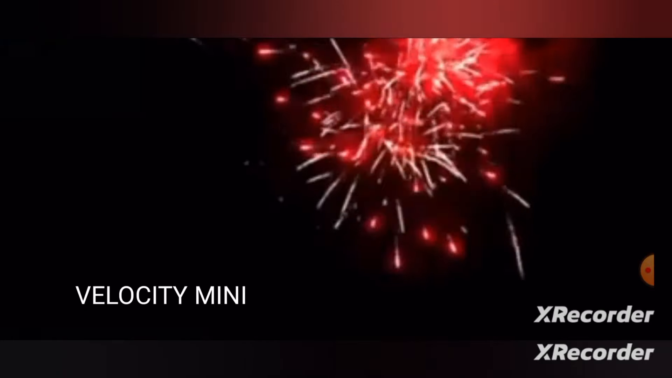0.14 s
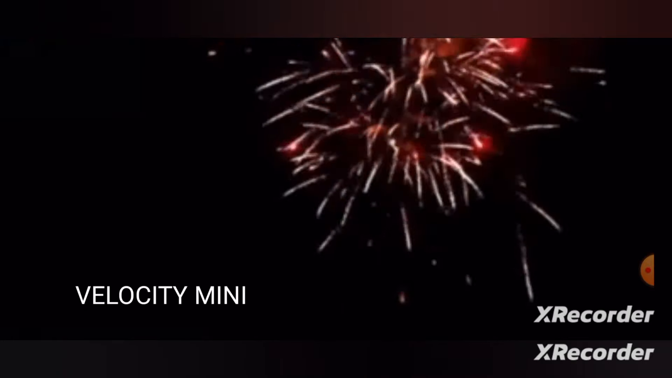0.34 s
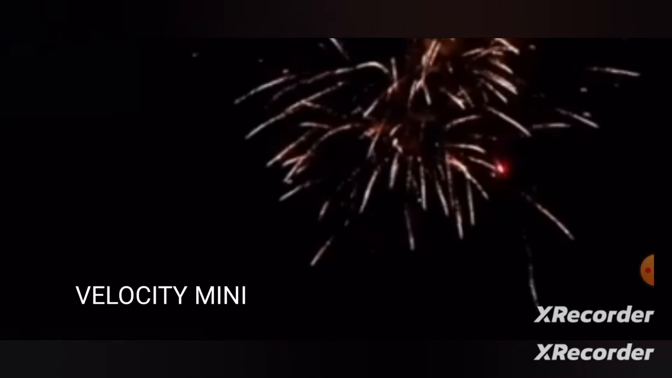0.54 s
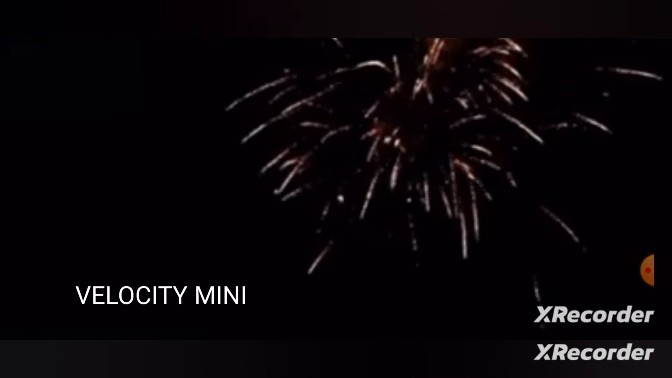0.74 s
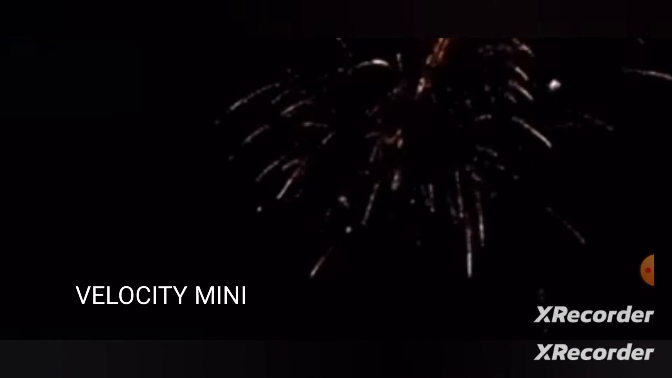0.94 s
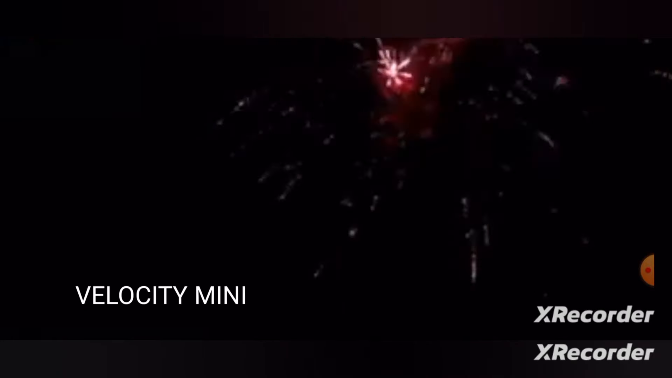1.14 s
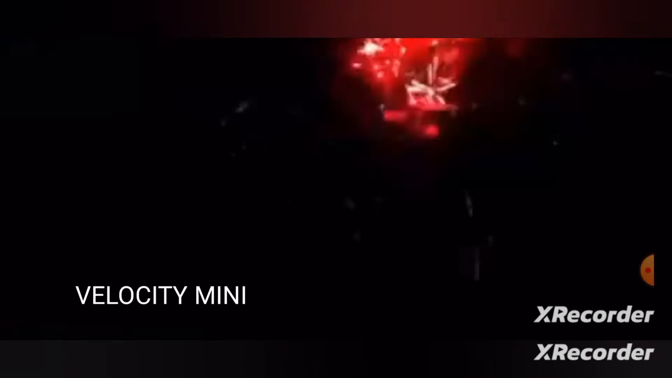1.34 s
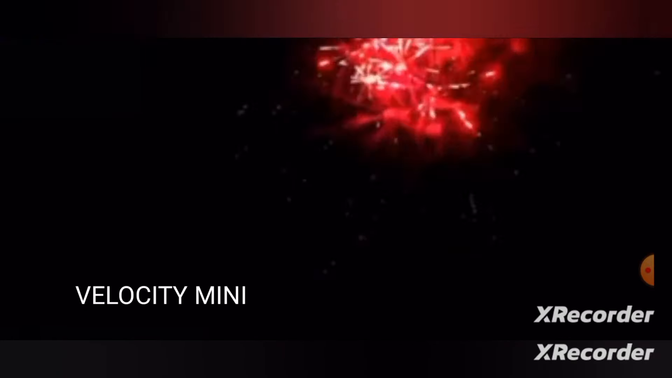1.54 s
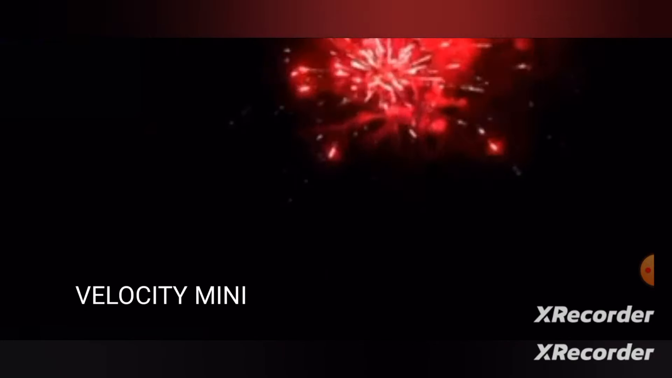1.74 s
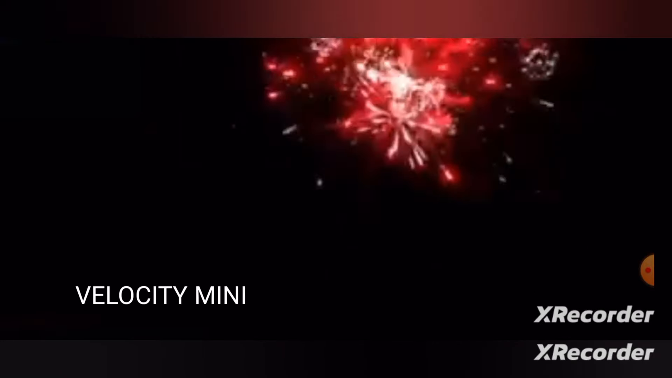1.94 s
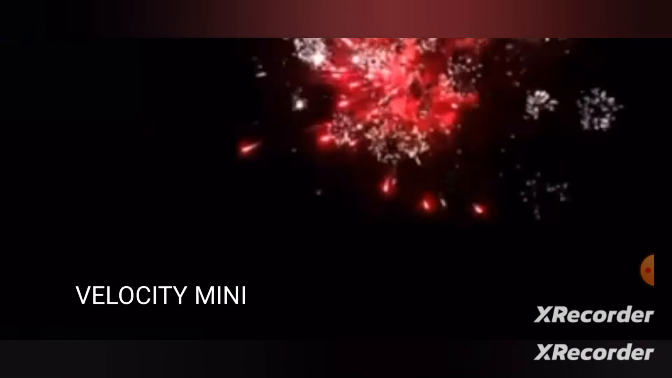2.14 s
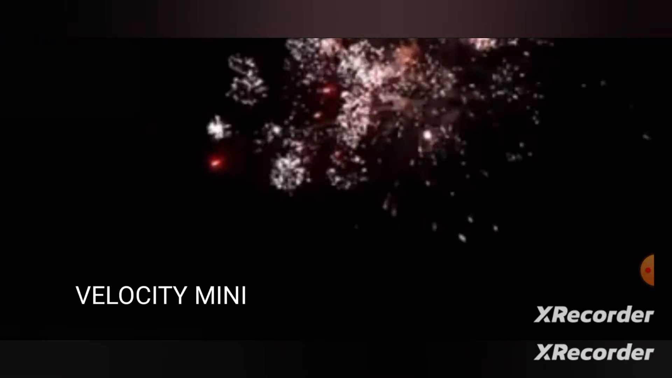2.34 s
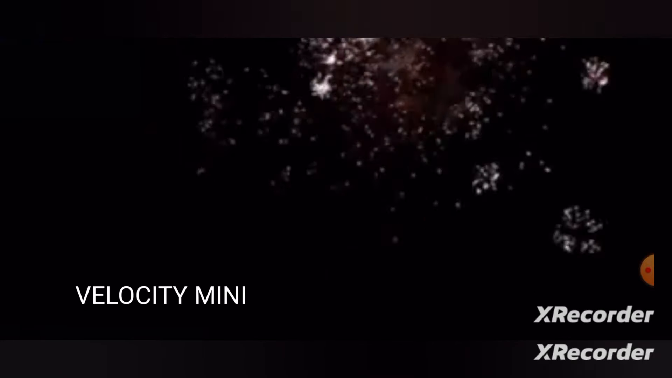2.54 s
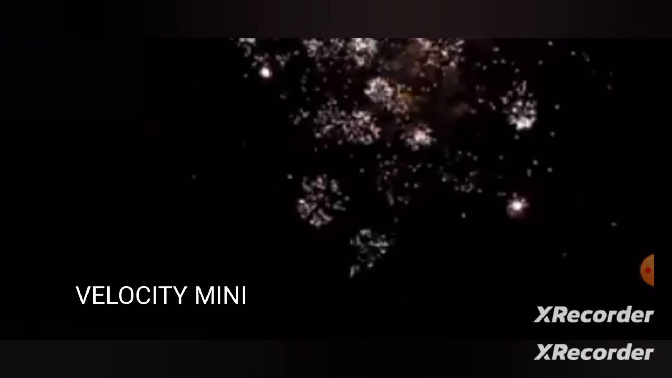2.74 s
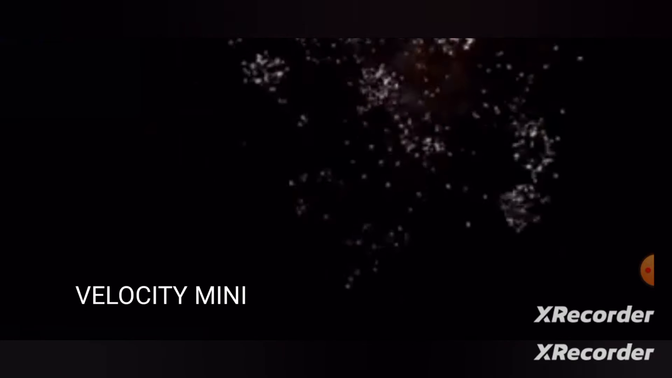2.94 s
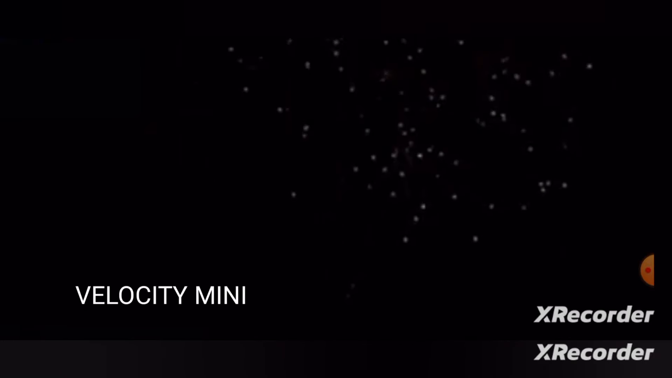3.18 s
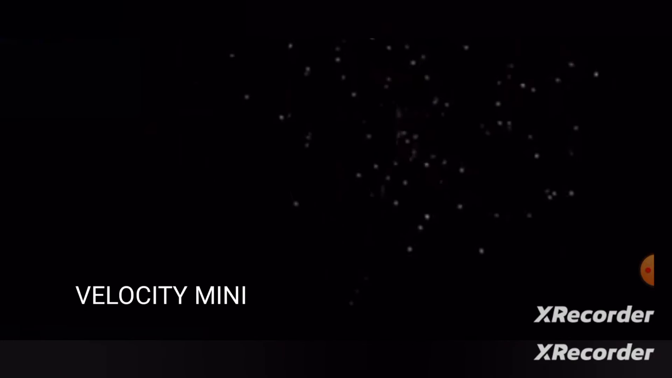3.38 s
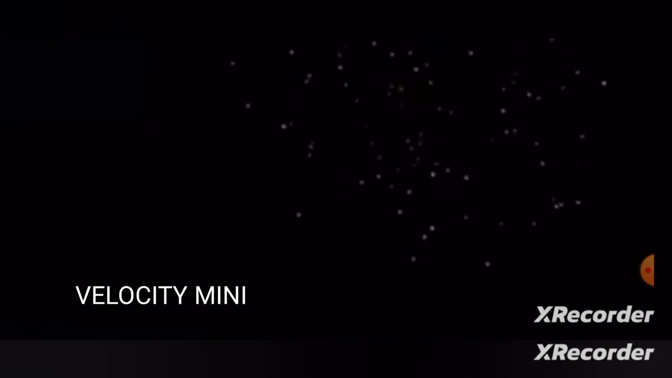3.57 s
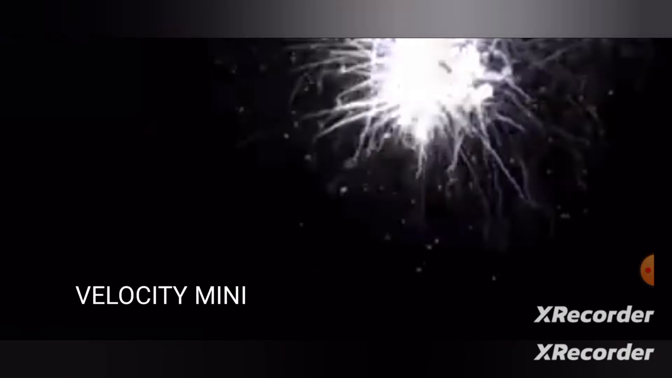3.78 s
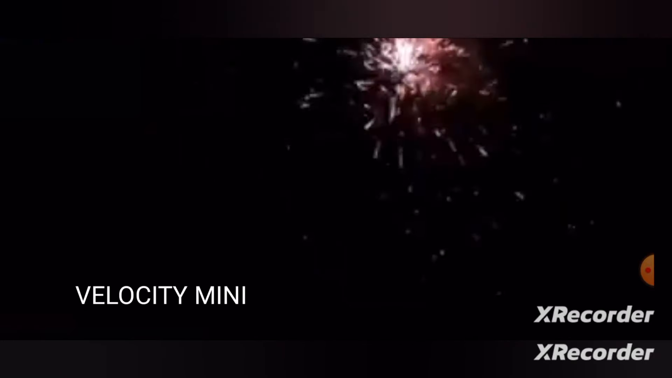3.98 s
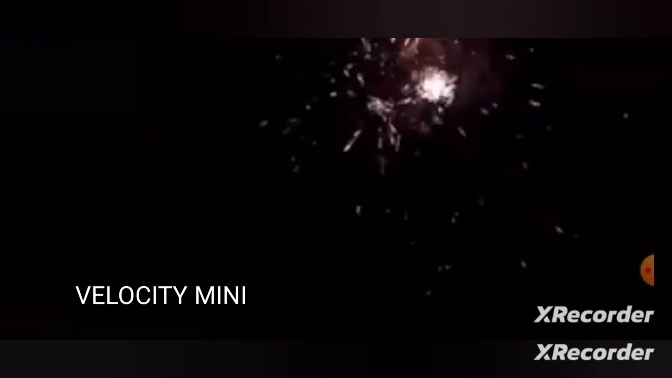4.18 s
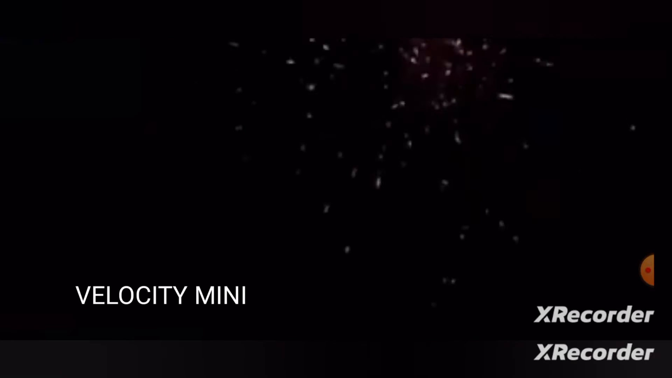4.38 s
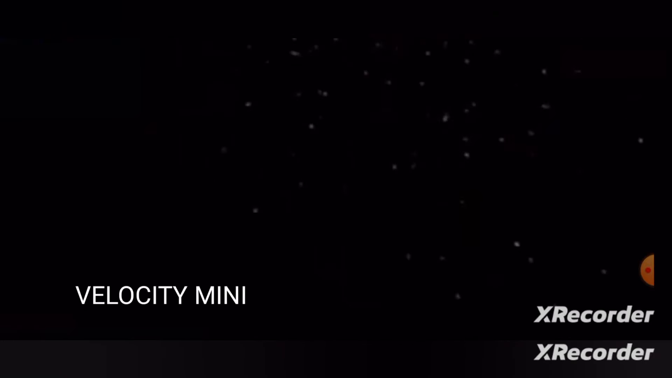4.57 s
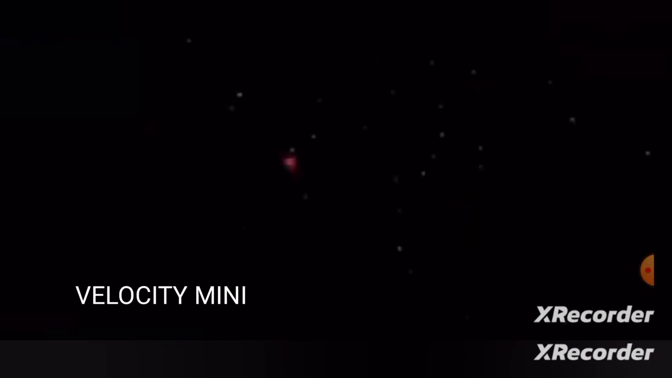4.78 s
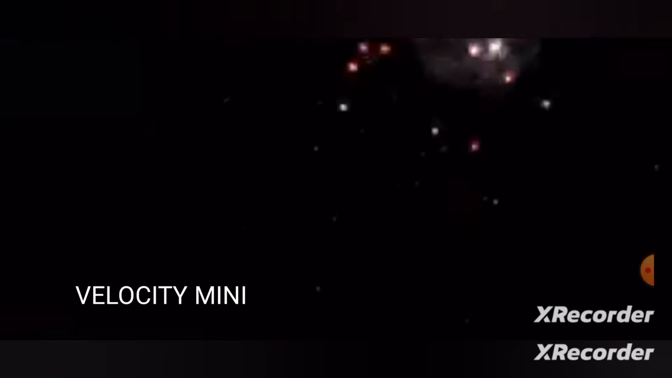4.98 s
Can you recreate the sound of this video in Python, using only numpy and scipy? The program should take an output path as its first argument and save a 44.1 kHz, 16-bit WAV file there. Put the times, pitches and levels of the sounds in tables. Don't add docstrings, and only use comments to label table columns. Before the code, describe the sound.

Heavy firework lift shots punch the overloaded microphone, each with quick ground echoes and a thud off a far wall. Sparks fizz and sizzle over low rumble. Three volleys: a brief opening one, a long one ending in thick popping crackle, and a short final burst with stray snaps. Between them only a faint far-off low hum remains. A tinny, delayed loudspeaker copy colours everything with a harsh ring.

```python
import sys
import numpy as np
from scipy import signal
from scipy.fft import rfft, irfft, next_fast_len
from scipy.io import wavfile
from scipy.ndimage import uniform_filter1d

SR = 44100
rng = np.random.default_rng(int(sys.argv[2]) if len(sys.argv) > 2 else 0)


def to_wav(sig):
    pcm = np.clip(np.atleast_2d(sig), -1, 1) * 32767
    pcm = np.round(pcm).astype(np.int16)
    wavfile.write(sys.argv[1], SR, pcm.T)


def rack_gain(trim_db):
    fader = np.asarray(trim_db, float)
    return 10 ** (fader / 20)


N = 221116
LAG = 3843
LENGTH = N + LAG


# (time [s], strength [dB], length [ms],
# ground echo delay [ms], slow air swing [signed size])
LIFT_BLASTS = [(0.0241, 10, 0.65, 4.54, 2.3), (0.1376, 12, 0.48, 6.3, 1.5), (.146, 2, 0.41, 5, 0),
               (0.079, -3, 0.7, 3.9, 0.9), (1.3371, 10, 0.82, 4.9, 1.3), (1.399, 5, 0.31, 6.1, 0),
               (1.544, 12, 0.71, 4.05, -2.5), (1.5942, 8.5, 0.5, 6.2, 2.4), (1.6778, 11, 0.6, 5.85, 3.1),
               (1.7397, 12, 0.52, 6, 3.9), (1.8598, 10.5, 0.84, 4.35, 1.7), (2.0214, 13, 0.52, 5.6, 2.5),
               (2.1137, 11, 0.51, 5.3, 1.7), (3.8764, 10.5, 0.54, 5, -0.7), (3.9014, 10, 0.53, 5, 1.1),
               (3.9478, 9.5, 0.5, 5.76, 1.2), (3.9703, 9, 0.88, 4.24, 0.9), (4.0735, 12, 0.53, 6.3, 1),
               (4.083, 7, 0.7, 6.7, 3.5), (4.1913, 12.5, 0.87, 4.64, 2.3), (4.33, 6.5, 0.79, 5.1, 1.8)]
# (share of the blast [ratio], dull above [Hz])
GROUND_BOUNCES = [
    (0.68, 1100),
    (0.18, 880),
    (0.11, 230),
]
# (frequency [Hz], level [dB])
WALL_TONE = [(150, -25.5), (480, 4.5), (900, -9.5), (2500, -24.5)]


def blasts():
    out = np.zeros(LENGTH)
    t = np.arange(4000) / SR
    near_tone = [(80, -27.5), (220, 1.5), (450, -13.0), (1200, -17.0), (4000, -31.5)]
    wall_s, wall_smear_s = 0.0617, 0.0054
    scatters = rng.standard_normal((len(LIFT_BLASTS), 4000))
    for (s, db, ms, echo_ms, swing), scatter in zip(LIFT_BLASTS, scatters):
        u = np.maximum((t - .0006) * 1000 / ms, 0)
        push = -np.cos(np.pi * u / 5.4) * np.exp(-u / 4.5) * (u < 8.1) * (u > 0)
        lead = .3 * np.sin(np.pi * t / .0006) * (u == 0)
        front = signal.lfilter(*signal.butter(2, 2600., fs=SR), push + lead)

        near = evened(colour(scatter, near_tone))
        near = 0.18 * near * rack_gain(-60 * t / 0.1) * np.clip((t - .003) / 0.00067, 0, 1)
        swing_hz = 43.7 - 5.5 * abs(swing)
        air = 1.11 * swing * np.sin(2 * np.pi * swing_hz * t) * np.exp(-t / 0.0073)
        add(out, s - .0006, rack_gain(db) * (front + near) + air)

        thud = evened(colour(scatter[::-1], WALL_TONE))
        thud = thud * np.exp(-((t - wall_s) / wall_smear_s) ** 2)
        add(out, s, 0.082 * rack_gain(db) * thud)

        for k, (share, dull_hz) in enumerate(GROUND_BOUNCES):
            echo = signal.lfilter(*signal.butter(2, dull_hz, fs=SR), push)
            add(out, s - .0008 + (k + 1) * echo_ms / 1000, share * rack_gain(db) * echo)
    return out


# (time [s], peak level [dB], length [ms])
SHELL_BURSTS = [
    (0.2664, 1.5, 2.2),
    (0.3797, 0, 2.3),
    (2.227, -2.5, 2.6),
    (2.2482, -4, 3),
    (2.279, 0, 3),
    (2.324, -3, 2.4),
    (2.35, -4, 2.2),
    (2.3767, -3.5, 2.4),
    (2.408, -4.5, 2.5),
    (2.4402, -2, 2),
]


def bursts():
    out = np.zeros(LENGTH)
    t = np.arange(-300, 2000) / SR
    for s, db, ms in SHELL_BURSTS:
        u = t * 1000 / ms
        push = (2.64 * u ** 2 - 1) * np.exp(-u ** 2 * 1.97)
        after = 0.21 * np.sin(2 * np.pi * 58 * t) * np.exp(-t / 0.03) * (t > 0)
        add(out, s + t[0], rack_gain(db) * (push + after))
    return out


# (frequency [Hz], level [dB])
CRACK_TONE = [(200, -30), (700, 0.5), (1500, 3.5), (3000, -1.5), (6000, -2), (7500, -5), (11000, -68.5)]
# (frequency [Hz], level [dB])
EDGE_TONE = [(4000, -61), (7500, 1.5), (10000, -3.5), (12500, -7.5), (14500, -3.5), (16000, -3.5)]


def cracks():
    crack, edge = np.zeros((2, LENGTH))
    for s, db, edge_db in stars():
        add(crack, s, np.array([rack_gain(db + 8.5)]))
        add(edge, s, np.array([rack_gain(edge_db + 19.5)]))
    crack, edge = colour(crack, CRACK_TONE), colour(edge, EDGE_TONE)

    t = np.arange(1500) / SR
    ground = 0.011 * np.exp(-((t - .007) / 0.0054) ** 2)
    tail = rng.standard_normal(1500) * (0.032 * rack_gain(-60 * t / 0.16) + ground)
    tail[0] = 1
    return crack + signal.oaconvolve(edge + 0.41 * crack, tail)[:LENGTH]


# (time [s], crack level [dB],
# sharp edge level [dB])
LONE_STARS = [(0.362, -12, -32), (0.375, -7, -19), (0.3826, -10, -28), (0.392, -14, -30),
              (0.3999, -18, -36), (0.4607, -12, -26), (0.5197, -35, -46), (0.575, -17, -49),
              (0.7822, -40, -58), (0.814, -20, -55), (1.0804, -34, -43), (1.1203, -40, -44),
              (2.9342, -3, -28), (3.076, -19, -27), (3.1213, -24, -32), (3.149, -27, -43),
              (3.2503, -1.5, -20), (3.2553, -1.5, -44), (3.2564, -4.5, -40.5), (3.2993, -16.5, -39),
              (4.4506, 0, -29), (4.4656, -11, -30), (4.6393, -4.5, -19), (4.6704, -2.5, -27),
              (4.6753, -12, -35), (4.761, -3.5, -19), (4.7684, -15, -31), (4.829, -23, -33),
              (4.8467, -21, -42), (4.9216, -3.5, -21)]
# (time [s], crack level [dB], sharp edge level [dB])
LEADING_POPS = [(2.2146, 1, -19), (2.2226, -10, -16), (2.256, -0.5, -15), (2.304, -2, -18),
                (2.3224, -5, -17), (2.332, 0.5, -13), (2.3762, 1, -15), (2.408, 2.5, -10), (2.4712, 1, -16),
                (2.4853, -11, -20), (2.502, 5, -13), (2.5505, 3.5, -23), (2.5825, -6, -16),
                (2.5919, 2.5, -26), (2.6323, -6, -33), (2.641, 0, -19), (2.6764, 2.5, -14),
                (2.711, -18, -24), (2.7368, -1, -15), (2.7728, -7, -16), (2.789, 4, -15), (2.8371, 10, -13),
                (2.882, -7, -24), (2.8945, 0.5, -18), (2.916, -8, -20), (2.9422, -1.5, -17),
                (2.9764, -1, -17), (2.989, -4, -21), (3.0334, 0.5, -20), (3.0525, -2.5, -19)]


def stars():
    pops = np.array(LEADING_POPS)
    rows = [np.array(LONE_STARS), pops]
    nearest_s, farthest_s = .003, .008
    mate_db, spread_db = -7.5, 4
    for side in (-2, -1, 1, 2):
        gap, crack, edge = rng.random((len(pops), 3)).T
        step_s = side * (nearest_s + gap * (farthest_s - nearest_s))
        crack_db = mate_db + spread_db * (2 * crack - 1)
        edge_db = mate_db + spread_db * (2 * edge - 1)
        rows.append(pops + np.transpose([step_s, crack_db, edge_db]))
    return np.vstack(rows)


RUMBLE_TONE = [(30, -22), (70, -2.5), (130, -2.5), (230, -0.5), (450, 0), (650, -4), (1200, -39.5),
               (2500, -95)]
BODY_TONE = [(200, -69), (420, 0.5), (600, 3.5), (880, 2), (1100, -4.5), (1450, -6), (1900, -10),
             (3000, -28.5), (6000, -108.5)]
FIZZ_TONE = [(2500, -76.5), (3950, -7.5), (4600, 1.5), (6200, -3), (7500, -11.5), (11000, -72.5)]
SIZZLE_TONE = [(500, -56), (1300, 4.5), (2100, 3.5), (3300, 1), (3900, -5.5), (5500, -47)]


def roar():
    echo_db, wash_db, falling_db, spark_db = controls()
    rumble_db = joined(echo_db, wash_db - 13.5)
    body_db = joined(echo_db - 1, wash_db)
    edge_db = joined(-6 + 1.96 * spark_db, echo_db - 16.5, -60)
    sizzle_db = joined(spark_db - 2, falling_db)
    busy = np.clip((rumble_db + 36) / 18, .3, 1)

    low, mid, hiss, chance, sign = rng.standard_normal((5, LENGTH))
    spark_size = rack_gain(5.4 * np.minimum(rng.exponential(1, LENGTH), 2.5))
    sparks = evened((chance > 2.1) * sign * spark_size)
    spark_share = 0.19
    grit = np.sqrt(1 - spark_share) * hiss + np.sqrt(spark_share) * sparks
    grit = grit * rack_gain(1.47 * lumps(130., 0.013))

    roll_db = rumble_db + busy * 1.3 * lumps(45., .012)
    rumble = rack_gain(roll_db) * evened(colour(low, RUMBLE_TONE, size=8192))
    lumpy = mid * rack_gain(busy * 2.1 * lumps(60., 0.0026))
    body = rack_gain(body_db - 5.5) * evened(colour(0.83 * lumpy + 0.59 * grit, BODY_TONE))
    fizz = rack_gain(spark_db - 16) * evened(colour(grit, FIZZ_TONE))
    later_grit = np.roll(grit, 290)
    sizzle = rack_gain(sizzle_db - 11.5) * evened(colour(later_grit, SIZZLE_TONE))
    edge = rack_gain(edge_db + 2.5) * evened(colour(grit, EDGE_TONE))
    return rumble + body + fizz + sizzle + edge


# (first shot [s], echoes fade from [s], echo level [dB], fade [dB per s], lingering wash level [dB])
VOLLEY_ECHOES = [
    (-.1, 0.222, -17, 67, -21.5),
    (1.33, 2.187, -19, 16.5, -23.5),
    (3.875, 4.434, -17.5, 94, -20),
]
# (time [s], level [dB])
SPARK_CURVES = [
    [(-.09, -15.5), (.11, -10.5), (.22, -10.5), (.36, -17), (.46, -20.5), (.62, -26), (.9, -28),
     (1.12, -32.5), (1.3, -40)],
    [(1.337, -16.5), (1.44, -10.5), (1.55, -16.5), (1.65, -12), (2.18, -12.5), (2.6, -17.5), (2.82, -17),
     (3.06, -23), (3.55, -35)],
    [(3.877, -25), (4.03, -11.5), (4.4, -12), (4.61, -21), (4.93, -27)],
]


def controls():
    t = (np.arange(LENGTH) - LAG) / SR
    echo, wash, falling, spark = np.zeros((4, LENGTH))
    for (first, last, db, fade, wash_db), curve in zip(VOLLEY_ECHOES, SPARK_CURVES):
        on = t >= first
        now = t[on]
        build_db = -1 * np.maximum(1 - (now - first) / 0.2, 0)
        echo[on] = db - fade * np.maximum(now - last, 0) + build_db
        wash[on] = wash_db
        falling[on] = wash_db - 3 - 43 * np.maximum(now - last - 0.76, 0)
        spark[on] = np.interp(now, *np.transpose(curve))
    return echo, wash, falling, spark


# (frequency [Hz], level [dB])
NIGHT_TONE = [(20, -17.5), (55, 5), (90, 1.5), (140, -4), (250, -10.5), (500, -48), (1200, -116)]


def night():
    hum = evened(colour(rng.standard_normal(LENGTH), NIGHT_TONE, size=8192))
    return rack_gain(-32 + 0.4 * flicker(11.0)) * hum


# (frequency [Hz], level [dB])
SPEAKER_TONE = [(250, -25), (600, -16.5), (1300, 2), (3200, 3.5), (4600, 3.5), (5150, -8), (5600, 15.5),
                (6100, 20.5), (6700, 15.5), (7150, 5.5), (7500, -36), (8000, -71)]


def loudspeaker(direct):
    copy = -.8 * overload(tinted(direct, SPEAKER_TONE), 2.2)
    return tinted(copy, [(7200, 1.5), (7800, -37), (9000, -59)])


def read(points, hz):
    f, value = np.transpose(points)
    return np.interp(np.log(hz + 1), np.log(f + 1), value)


def colour(x, points, size=2048):
    gain = np.log(rack_gain(read(points, abs(np.fft.fftfreq(size, 1 / SR)))))
    taps = np.fft.ifft(np.exp(np.conj(signal.hilbert(gain)))).real
    return signal.oaconvolve(x, taps[:size // 2])[:len(x)]


def tinted(x, points):
    size = next_fast_len(len(x) + 4096)
    gain = rack_gain(read(points, np.fft.rfftfreq(size, 1 / SR)))
    return irfft(rfft(x, size) * gain, size)[:len(x)]


def evened(x):
    return x / np.sqrt(np.mean(x ** 2))


def add(mix, s, sound):
    part = mix[round(s * SR) + LAG:][:len(sound)]
    part += sound[:len(part)]


def flicker(per_s):
    width = int(SR / per_s)
    smooth = uniform_filter1d(rng.standard_normal(LENGTH), width)
    return evened(uniform_filter1d(smooth, width))


def lumps(per_s, fade_s):
    arrivals = (rng.random(LENGTH) < per_s / SR) * rng.exponential(1, LENGTH)
    fading = signal.lfilter([1], [1, -np.exp(-1 / (fade_s * SR))], arrivals)
    level = np.log(fading + 0.3)
    return evened(level - uniform_filter1d(level, 4000))


def joined(*dbs):
    return 10 * np.log10(sum(rack_gain(db) ** 2 for db in dbs))


def overload(x, knee):
    return x / (1 + abs(x) ** knee) ** (1 / knee)


# (frequency [Hz], level [dB])
MICROPHONE_TONE = [(20, 0.5), (6000, 0.5), (12000, -4), (16000, -18)]


def scene():
    sources = blasts() + bursts() + cracks() + roar() + night()
    direct = colour(1.085 * overload(sources, 5.4), MICROPHONE_TONE)
    direct = signal.lfilter(*signal.butter(1, 3.7, "high", fs=SR), direct)
    copy = loudspeaker(direct)
    return np.tile(direct[LAG:] + copy[:N], (2, 1))


def top_cut(x):
    return signal.sosfilt(signal.butter(12, 15840, fs=SR, output="sos"), x)


# (start [s], end [s], level under the mix [dB])
GRAIN_MOMENTS = [
    (1.3, 1.346, -17.5),
    (2.1, 2.125, -33),
    (2.662, 2.673, -32),
    (3.306, 3.337, -15),
    (3.87, 3.97, -33.5),
    (4.054, 4.073, -37),
    (4.764, 4.86, -37),
]
# (frequency [Hz], level [dB])
GRAIN_TONE = [(100, 3), (1000, -4), (5000, -2.5), (9000, 6), (15000, -13)]


def record(dry):
    clipped = 1.03 * overload(dry, 14.0)
    t = np.arange(N) / SR
    loudness = np.sqrt(abs(uniform_filter1d(clipped[0] ** 2, 1000)))
    gate = sum(rack_gain(db) * (t > start) * (t < end) for start, end, db in GRAIN_MOMENTS)
    grain = evened(colour(rng.standard_normal(N), GRAIN_TONE)) * loudness * gate
    mixed = clipped + np.array([grain, -grain])
    low_pass = signal.firwin(511, 15850, window=("kaiser", 9), fs=SR)
    limited = signal.oaconvolve(mixed, low_pass[None], "same")
    finished = np.clip(limited, -1, 1)
    return top_cut(finished)


dry = scene()
out = record(dry)
to_wav(out)
```